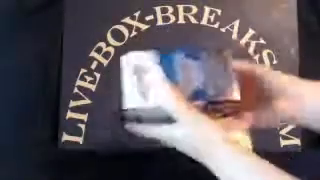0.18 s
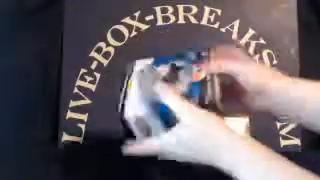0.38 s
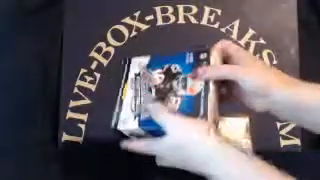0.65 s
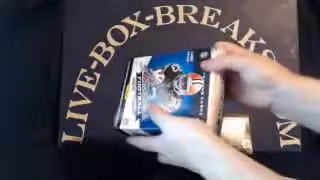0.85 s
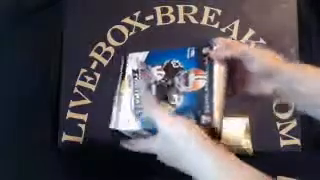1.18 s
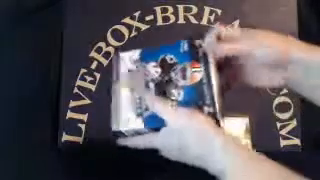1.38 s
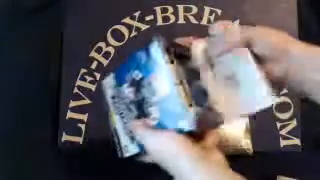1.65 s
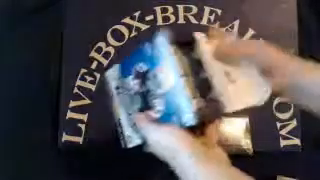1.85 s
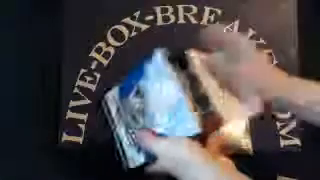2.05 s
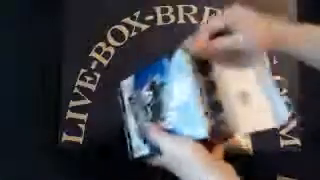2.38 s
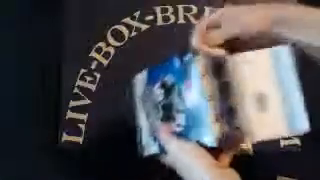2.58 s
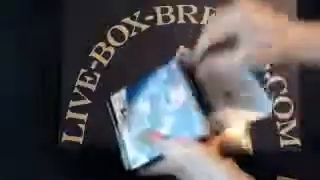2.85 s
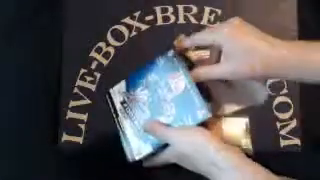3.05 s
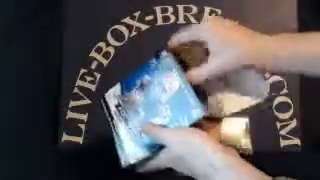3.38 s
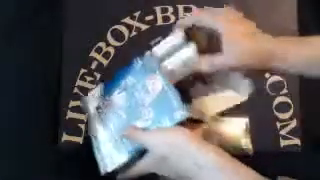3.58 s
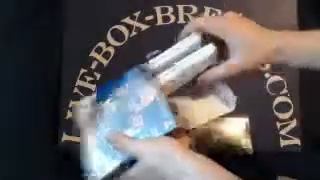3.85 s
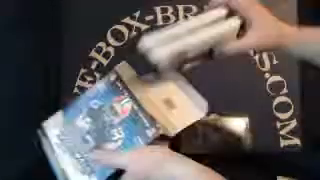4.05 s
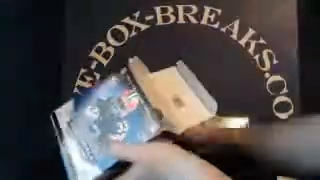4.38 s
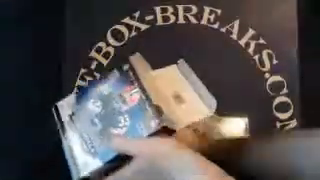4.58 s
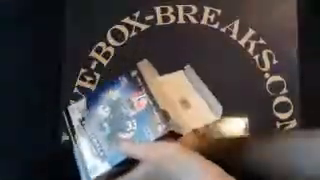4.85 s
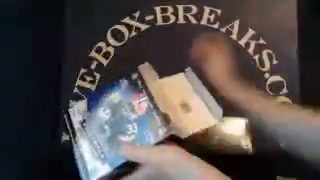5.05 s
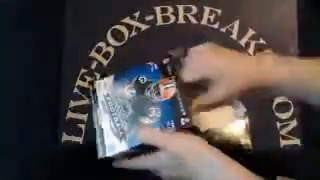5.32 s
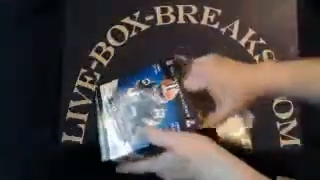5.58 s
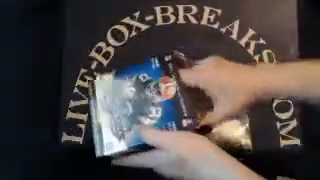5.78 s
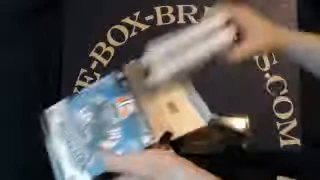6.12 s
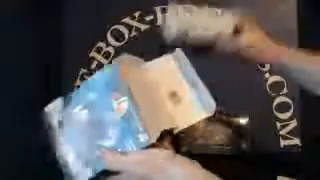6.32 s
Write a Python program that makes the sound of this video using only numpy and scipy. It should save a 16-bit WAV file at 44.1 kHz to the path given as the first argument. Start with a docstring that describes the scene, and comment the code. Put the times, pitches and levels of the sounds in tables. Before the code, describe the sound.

Close, dry handling of a small card box on a cloth-covered table, over a very faint hush. The first half second is almost silent; around 0.6 s there is a papery rub with a small snap, then little until 1.3 s, when brisk scuffs and a thud begin. From 1.55 to 2.35 s creases pop and crunch in quick, uneven succession. At about 2.5 s the lid cracks loose, the loudest snapping cluster, with a low hollow thump, and a harsh rustle trails to 2.8 s with brighter crackle. From 3 to 3.7 s only faint, crisp ticks and thin rubs. Packs slide out near 3.9 s; soft taps and scrapes follow, stronger at 4.5 and 4.95 s. Hollow bumps at 5.3 and 5.5 s lead to hard, short knocks around 5.7 and 5.8 s. After a quiet gap, a crackly rub and snap end it from 6.35 s.

```python
"""Two hands work open a cardboard box of trading cards on a cloth-covered table, close to a small microphone.
Creases snap as bursts of noise, and card and wrappers slide with noisy friction and tiny crackles;
both ring through the panels of the box. Fingertips and pack edges chafe as noise around a moving pitch.
Soft bumps are short, hollow tones with some noise. A small, dry room and a faint hush surround it all."""
import sys
import numpy as np
from scipy import signal
from scipy.fft import rfft, irfft
from scipy.io import wavfile
from scipy.ndimage import uniform_filter1d

SR = 44100
rng = np.random.default_rng(int(sys.argv[2]) if len(sys.argv) > 2 else 0)


def bounce(signal):
    """Save signal as a 16-bit WAV file at the path given by the first command-line argument."""
    frames = np.transpose(np.atleast_2d(signal))
    limited = np.clip(frames, -1, 1)
    pcm = np.round(limited * 32767).astype(np.int16)
    wavfile.write(sys.argv[1], SR, pcm)


N = 284004

# Colour of the quiet room and microphone hiss; only the shape counts: pitch_hz [Hz], level_db [dB per Hz]
HUSH_COLOUR = [(30, -27), (121, 3.5), (247, -1.5), (734, -10), (6340, -25.5), (8620, -33), (11200, -63)]
HUSH_DB = -78.5  # rms of the hush before the microphone
# Borders between bass, middle and treble: pitch_hz [Hz]
REGISTER_EDGES_HZ = [30, 450, 2800, 9000]
TOP_HZ = 8400  # upper limit of the microphone
# Panels of the box: pitch_hz [Hz], width_hz [Hz], level_db [dB above the direct sound], before the grip
PANELS = [(121.1, 140, 7.5), (224, 53, 9), (585.8, 39, 14.5), (700, 110, -3), (910, 39, -3), (1260, 290, 1),
          (1600, 230, -1.5), (2170, 180, 3), (2720, 36, -3.5)]
# Soft bumps of box and packs:
# start_s [s], level_db [dB], pitch_hz [Hz], fade_s [s to fall by 60 dB], contact_s [s]
BUMPS = [(0.507, -43.5, 553, 0.033, 0.0028), (1.461, -22, 230, 0.014, 0.0026),
         (1.805, -25.5, 200, 0.044, 0.0026), (2.340, -27, 585, 0.033, 0.0058),
         (2.493, -16, 130.5, 0.13, 0.0033), (2.505, -17.5, 578, 0.11, 0.0036),
         (2.534, -16.5, 133, 0.072, 0.0026), (2.749, -31, 142, 0.14, 0.0044),
         (3.272, -36.5, 210, 0.0084, 0.0092), (4.025, -33, 174, 0.025, 0.0019),
         (4.077, -29, 264, 0.076, 0.0014), (4.254, -38, 247, 0.078, 0.0033),
         (4.284, -38.5, 257, 0.1, 0.0058), (4.489, -29.5, 282, 0.086, 0.0031),
         (4.556, -20.5, 544, 0.018, 0.00096), (4.723, -27, 596, 0.049, 0.0029),
         (4.79, -35, 240, 0.12, 0.0013), (4.968, -21, 227, 0.057, 0.0027), (5.176, -31, 211, 0.096, 0.0031),
         (5.29, -22.5, 598, 0.048, 0.0049), (5.484, -17.5, 408, 0.05, 0.0041),
         (5.682, -11.5, 355, 0.025, 0.0016), (5.686, -17.5, 246, 0.061, 0.002),
         (5.796, -27, 261, 0.15, 0.0083), (5.796, -6.5, 470, 0.017, 0.0011),
         (5.798, -25, 690, 0.098, 0.0025), (5.839, -24, 251.7, 0.056, 0.00087),
         (6.359, -24.5, 624, 0.031, 0.0022)]
# Fingertips and pack edges dragging:
# start_s [s], length_s [s], pitch_hz [Hz, halfway through the drag, apart from the wander],
# width_hz [Hz], level_db [dB rms]
CHAFES = [(0.777, 0.19, 1534, 500, -54.5), (0.976, 0.15, 1700, 1110, -60), (1.246, 0.026, 1350, 483, -50),
          (1.358, 0.052, 3050, 1980, -36.5), (1.386, 0.027, 4900, 1400, -33),
          (1.384, 0.062, 1755, 910, -31), (1.768, 0.12, 4345, 1600, -52), (2.254, 0.017, 1306, 673, -37.5),
          (2.266, 0.031, 3810, 1490, -42), (2.471, 0.2, 1244, 160, -37.5), (2.53, 0.13, 2250, 350, -36.5),
          (2.844, 0.061, 2670, 495, -49.5), (2.915, 0.044, 793, 400, -40.5), (2.961, 0.049, 2169, 403, -41),
          (3.103, 0.074, 2090, 500, -45), (3.217, 0.022, 1905, 308, -43.5),
          (3.495, 0.095, 4060, 1770, -54.5), (3.737, 0.0413, 2697, 180, -48), (4.142, 0.06, 1236, 294, -53),
          (4.308, 0.02, 1470, 252, -51), (4.38, 0.0885, 1289, 403, -48), (4.486, 0.052, 2200, 350, -42),
          (4.709, 0.11, 700, 600, -41.5), (4.959, 0.036, 857, 294, -27), (5.143, 0.0168, 1176, 396, -37.5),
          (5.307, 0.027, 2547, 700, -49), (5.503, 0.025, 1172, 450, -49.5), (5.521, 0.19, 2612, 499, -53),
          (5.727, 0.075, 717, 250, -54.5), (6.36, 0.08, 2450, 500, -51)]
# Colour of sliding card: pitch_hz [Hz], level_db [dB]
SLIDING_COLOUR = [(40, -24), (75, -20.5), (140, -6.5), (260, -6), (420, -4), (900, 4.5), (1500, 0.5),
                  (2800, -7), (4500, -9.5), (7000, -12.5), (8500, -34.5)]
# Strokes of card and wrapper under the hands: the box is turned over and gripped, the flap is worked
# out of its slot, the lid cracks loose and is folded back, fingers dig for the packs and draw them out,
# the packs are laid down and pushed along the cloth, the hand returns to the box for more.
# start_s [s], length_s [s], level_db [dB before the overall sliding level],
# press_db [dB change of pressure over the stroke], bass_db and treble_db [dB relative to the middle],
# crackle_share [0 to 1]
STROKES = [ (0.048, 0.21, -73, -18, -7, 0, .3), (0.54, 0.011, -45.5, 18, -4, 0, 0.2),
           (0.613, 0.13, -45, -13, -5, -13.5, 0.3), (0.814, 0.28, -63.5, -12, -17, -15.5, 0.4),
           (1.28, 0.044, -48.5, 3, -0.5, -16, 0.1), (1.344, 0.099, -35, 7, -12, -4, 0.3),
           (1.453, 0.22, -42.5, -21.5, -6.5, -21.5, 0), (1.671, 0.14, -43, 16.5, -7, -24, 0.3),
           (1.79, 0.23, -38, -3, -5.5, -19.5, 0.7), (2.28, 0.11, -38.5, -8.5, -11.5, -24, 0.6),
           (2.491, 0.18, -36, -14.5, -2, -5, 0.7), (2.703, 0.082, -33.5, 8.5, -11.5, -11.5, 0.8),
           (2.823, 0.15, -47, 1, -19, 1.5, 0.1), (3.113, 0.086, -50.5, -24, -4, -5.5, 0.3),
           (3.258, 0.0066, -50, 0, 1.5, -5, 0.5), (3.331, 0.0068, -53, 12, -23, -16, 0.2),
           (3.41, 0.064, -61, -9, -14, -1, 0.4), (3.527, 0.085, -61.5, -20.5, -18.5, 2, 0.2),
           (3.721, 0.055, -50, 8.5, -15, -9, 0), (3.946, 0.17, -49, -18.5, 0, -11.5, 0.5),
           (4.221, 0.12, -50.5, -6.5, 2.5, -13.5, 0.2), (4.416, 0.082, -39, 10.5, -9.5, -10, 0.5),
           (4.516, 0.12, -37, -2, -13, -7, 0.6), (4.674, 0.15, -49, -9, -3, -1.5, 0.7),
           (4.83, 0.152, -40.5, 3.5, -10.5, -3, 0.1), (5.167, 0.064, -43.5, -3.5, -14.5, -15.5, 0.1),
           (5.31, 0.0013, -45.5, -2.5, 6.5, -4, 0.5), (5.44, 0.0032, -51.5, 3, -7.5, 1, 0.4),
           (5.525, 0.048, -46.5, -16, -11, -7, 0.5), (5.59, 0.23, -61, -8, 7.5, -12.5, 0.5),
           (6.355, 0.16, -39, 3, -8.5, -19, 0.79)]
# A smooth stroke eases in, one that catches starts abruptly; all die away once the hand stops
SMOOTH_RISE_DB_PER_S, CATCHING_RISE_DB_PER_S, STROKE_RELEASE_DB_PER_S = 352.5, 5998.5, 568.5
# Colour of a snap: pitch_hz [Hz], level_db [dB]
SNAP_COLOUR = [(40, -29.5), (75, -12), (130, 1.5), (420, 10.5), (850, 10), (1350, 10.5), (2800, -10.5),
               (4500, -17.5), (7000, -22), (8500, -43)]
# Creases and flaps snapping: start_s [s], level_db [dB over 10 ms, before the overall snap level],
# bass_db and treble_db [dB relative to the middle], flap_hz [Hz, ring of the flap]
SNAPS = [(0.617, -23, -11.5, -16, 1250), (0.71, -37, 1, -14, 740), (0.984, -47.5, -12, -6.5, 1680),
         (1.072, -53, -5.5, 0, 1400), (1.097, -39.5, -12.5, -6.5, 1440), (1.333, -32, 2.5, -40.5, 704),
         (1.522, -42, -15, 8, 1620), (1.555, -18.5, -37, -10, 1640), (1.565, -35.5, 4, -28, 1340),
         (1.629, -37, -20, -33, 1240), (1.659, -30, -9.5, -18.5, 675), (1.688, -34.5, -11.5, -18.5, 620),
         (1.753, -26.5, -6.5, -22.5, 785), (1.789, -23, -11, -6, 1750), (1.849, -24, -7.5, -7, 1580),
         (1.884, -31, -4.5, -5, 1440), (1.94, -25, -14, -18, 1520), (1.951, -31, -7, -4.5, 1630),
         (1.979, -22.5, -14, -3, 2750), (2.03, -34.5, -11, -25, 1010), (2.053, -36.5, -5.5, -28, 1000),
         (2.117, -36, -31, -29, 1010), (2.135, -29.5, -41, -15, 1250), (2.145, -28, -30, -23, 754),
         (2.175, -34.5, -17, -13.5, 846), (2.189, -35.5, -22, -5, 800), (2.2, -38, -15, -8.5, 1540),
         (2.278, -24.5, -4, -18, 1190), (2.296, -33, -1.5, 1, 1600), (2.321, -30.5, -16, -3, 1270),
         (2.339, -26, -19, -10, 710), (2.493, -7.5, -6, -14.5, 1250), (2.53, -11.5, -6.5, -1.5, 2180),
         (2.54, -8, -24, -6, 1400), (2.554, -20.5, -14, -3, 1450), (2.588, -12, -7.5, 1, 1280),
         (2.663, -43, -11, 15.5, 2870), (2.706, -18, -2.5, -2.5, 1520), (2.75, -28.5, 5.5, 7, 3320),
         (2.764, -31, 0, -4, 2390), (2.837, -30.5, -2, 10.5, 2840), (2.977, -41.5, -1.5, 14, 2140),
         (3.105, -39, -15, 5.5, 2650), (3.144, -40.5, -25, 8, 2270), (3.182, -34.5, 1, -25, 680),
         (3.194, -32.5, -6, -9, 2160), (3.414, -35.5, -9.5, -28, 695), (3.636, -45.5, -21.5, -2.5, 2020),
         (3.764, -46, -14.5, 8, 2830), (3.782, -29.5, -4.5, -17, 900), (3.935, -26, -6.5, -18, 1610),
         (3.98, -38.5, 2, -0.5, 1270), (4.036, -37.5, 1, -6.5, 1570), (4.078, -34.5, -23.5, -40, 1430),
         (4.288, -37.5, -13, -18, 1160), (4.582, -30.5, -0.5, -18, 840), (4.677, -33, -13.5, -7, 1015),
         (4.922, -30, -1.5, -17, 890), (4.962, -21, -2, -6.5, 940), (4.997, -20.5, -13, -7, 1620),
         (5.2, -29, -33, -8, 1150), (5.575, -36, -7, -16, 825), (6.361, -26.5, -2, -15, 702),
         (6.429, -28.5, -35, -3, 1360)]


def undb(db):
    """Turn decibels into a gain."""
    return 10 ** (np.asarray(db) / 20)


def seconds(length):
    """Time axis of a short sound."""
    return np.arange(int(length * SR)) / SR


def unit(x):
    """Scale to rms 1."""
    return x / np.sqrt(np.mean(x ** 2))


def add(track, start_s, sound):
    """Mix a sound in at a time."""
    start = int(start_s * SR)
    track[start:start + len(sound)] += sound[:max(N - start, 0)]


def lowpass_noise(top_hz, shape):
    """Noise below a cutoff."""
    sos = signal.butter(2, top_hz, fs=SR, output="sos")
    return signal.sosfilt(sos, rng.standard_normal(shape))


def band(x, lo_hz, hi_hz, order=3):
    """Keep only the sound between two pitches."""
    return signal.sosfilt(signal.butter(order, [lo_hz, hi_hz], "band", fs=SR, output="sos"), x)


def registers(x):
    """Split a sound into bass, middle and treble."""
    return [band(x, lo, hi) for lo, hi in zip(REGISTER_EDGES_HZ, REGISTER_EDGES_HZ[1:])]


def resonance(x, hz, width_hz):
    """Let one mode ring, with gain 1 at its centre."""
    return signal.lfilter(*signal.iirpeak(hz, hz / width_hz, fs=SR), x)


def through(x, response):
    """Pass a sound through an impulse response."""
    return signal.fftconvolve(x, response)[:len(x)]


def colour(points, size=4096):
    """Make an impulse response with a given spectrum and no sound ahead of its start."""
    hz, db = np.transpose(points)
    bins_hz = np.fft.rfftfreq(size, 1 / SR)
    gain = undb(np.interp(np.log(bins_hz + 1), np.log(hz), db))
    # folding the cepstrum gives minimum phase
    cepstrum = irfft(np.log(gain))
    cepstrum[1:size // 2] *= 2
    cepstrum[size // 2 + 1:] = 0
    return irfft(np.exp(rfft(cepstrum)))


def walk(rate):
    """Glide between random levels, about `rate` of them a second, with rms 1."""
    hold = int(SR / rate)
    levels = np.repeat(rng.standard_normal(N // hold + 1), hold)[:N]
    return unit(uniform_filter1d(levels, hold))


def quiet_hush():
    """Faint steady noise of the room and the microphone."""
    return undb(HUSH_DB) * unit(through(rng.standard_normal(N), colour(HUSH_COLOUR)))


def room(x, wet_db=-10, bass_t60=0.13, middle_t60=0.15, treble_t60=0.16, first_echo_s=0.0036):
    """Table and near walls answer within milliseconds; the treble fades slightly slower than the bass."""
    t = seconds(.4)
    parts = registers(rng.standard_normal(len(t)))
    fades_s = (bass_t60, middle_t60, treble_t60)
    tail = sum(part * np.exp(-np.log(1000) * t / t60) for part, t60 in zip(parts, fades_s))
    tail = tail * (t > first_echo_s)
    heard_share = 2 * TOP_HZ / SR
    return x + undb(wet_db) * through(x, tail * np.sqrt(heard_share / np.sum(tail ** 2)))


def box(push, grip_shift=.035, grip_db=3.5):
    """The panels ring along; a random grip shifts the pitch and level of each of them."""
    ring = push
    for hz, width_hz, db in PANELS:
        shift, boost = rng.standard_normal(2)
        mode = resonance(push, hz * (1 + grip_shift * shift), width_hz)
        ring = ring + undb(db + grip_db * boost) * mode
    return ring


def flexing_box(push, regrip_rate=14, count=4):
    """The hands keep passing from one grip to another, so the ring of the panels moves."""
    holds = np.exp(2 * np.array([walk(regrip_rate) for _ in range(count)]))
    shares = holds / holds.sum(axis=0)
    return sum(box(push * share) for share in shares)


def bumps(scuff_db=-15, scuff_reach=1.114, scuff_decay=0.41, lowest_hz=85, body_db=-13, body_ratio=0.52):
    """A soft contact swells one mode of the hollow box, a deeper one, and a dull rattle of weaker ones."""
    out, t = np.zeros(N), seconds(.2)
    for start_s, db, hz, t60, contact_s in BUMPS:
        swell = np.sin(np.pi / 2 * np.minimum(t / contact_s, 1)) ** 2
        fade = np.exp(-np.log(1000) * np.maximum(t - contact_s, 0) / t60)
        scuff = unit(band(rng.standard_normal(len(t)), hz / 2, hz * scuff_reach, order=2))
        main_mode = np.sin(2 * np.pi * hz * t)
        deep_mode = undb(body_db) * np.sin(2 * np.pi * body_ratio * hz * t)
        # the rattle outlasts the two modes
        rattle = undb(scuff_db) * fade ** scuff_decay * scuff
        add(out, start_s, undb(db) * swell * (fade * (main_mode + deep_mode) + rattle))
    # such a small box radiates almost no deep bass
    return band(out, lowest_hz, TOP_HZ)


def chafes(flick_share=0.9, flick_s=0.033, sag_share=0.18, wander_share=0.032, wander_rate=60,
           stutter_db=4, stutter_rate=220, taper=0.6):
    """A stuttering drag makes noise around a wandering pitch, rising in a quick flick, sagging in a long drag."""
    out = np.zeros(N)
    wander = wander_share * walk(wander_rate)
    stutter = undb(stutter_db * walk(stutter_rate))
    for start_s, length, hz, width_hz, db in CHAFES:
        t = seconds(length)
        now = int(start_s * SR) + np.arange(len(t))
        glide = flick_share * np.exp(-length / flick_s) - sag_share
        centre_hz = hz * (1 + wander[now] + glide * (t / length - .5))
        phase = 2 * np.pi * np.cumsum(centre_hz) / SR
        # two slow noises on a moving carrier make a moving noise band
        noise = lowpass_noise(width_hz / 2, (2, SR // 2))[:, :len(t)]
        ring = noise[0] * np.cos(phase) + noise[1] * np.sin(phase)
        outline = np.sin(np.pi * t / length) ** taper
        add(out, start_s, undb(db) * unit(ring * stutter[now] * outline))
    return out


def strokes():
    """Each stroke takes hold, changes pressure and lets go: gains of the registers, and share of crackle."""
    power, slipping = np.zeros((3, N)), np.zeros(N)
    margin_s = .15
    for start_s, length, db, press_db, bass_db, treble_db, catch in STROKES:
        catch, lead_s = np.clip(catch, 0, 1), min(start_s, margin_s)
        t = seconds(lead_s + length + margin_s) - lead_s
        rise_db_per_s = SMOOTH_RISE_DB_PER_S ** (1 - catch) * CATCHING_RISE_DB_PER_S ** catch
        attack_db = rise_db_per_s * np.minimum(t, 0)
        pressure_db = press_db * (np.clip(t / length, 0, 1) - .5)
        release_db = -STROKE_RELEASE_DB_PER_S * np.maximum(t - length, 0)
        gain = undb(db + attack_db + pressure_db + release_db)
        for register, part_db in zip(power, (bass_db, 0, treble_db)):
            add(register, start_s - lead_s, (gain * undb(part_db)) ** 2)
        add(slipping, start_s - lead_s, catch * gain ** 2)
    return np.sqrt(power), np.clip(slipping / (power[1] + 1e-18), 0, 1)


def crackle(spread_db=5.0, ring_cycles=2.8, count=5000):
    """Many tiny catches of card and wrapper ring for a few cycles each, with more of them per octave higher up."""
    out, t = np.zeros(N), seconds(.03)
    for when, pitch, strength in rng.random((count, 3)):
        hz = TOP_HZ * (.1 + .9 * pitch) ** 2
        # higher catches are stronger, and a few of any pitch stand out
        size = hz ** .7 * undb(-spread_db * np.log(max(strength, .06)))
        add(out, when * N / SR, size * np.exp(-t * hz / ring_cycles) * np.sin(2 * np.pi * hz * t))
    return unit(out)


def friction(judder_db=5.0, judder_rate=110, shift_db=4.5, shift_rate=28):
    """The contact point wanders, so each part of the noise comes and goes, and the whole judders."""
    edges = np.r_[REGISTER_EDGES_HZ[0], np.geomspace(300, REGISTER_EDGES_HZ[-1], 9)]
    noise = np.zeros(N)
    for lo, hi in zip(edges, edges[1:]):
        noise += band(rng.standard_normal(N), lo, hi) * undb(shift_db * np.tanh(walk(shift_rate)))
    return unit(noise * undb(judder_db * np.tanh(walk(judder_rate))))


def sliding(level_db=-2.88):
    """Stick and slip: juddering friction plus the crackle of small catches, played into the panels."""
    gains, catch = strokes()
    rub = np.sqrt(1 - catch) * friction() + np.sqrt(catch) * crackle()
    ring = flexing_box(through(rub, colour(SLIDING_COLOUR)))
    return undb(level_db) * sum(unit(part) * gain for part, gain in zip(registers(ring), gains))


def snaps(first_kick=7.0, uneven_db=5, break_s=0.0031, slower_when_dull=0.33, settle_db=-24,
          settle_s=0.02, flap_db=7, flap_q=6, level_db=-5.5):
    """A crease gives way, fibres break for a few milliseconds, and the card settles."""
    out, t = np.zeros(N), seconds(.12)
    response = colour(SNAP_COLOUR)
    level_window = .01 * SR  # samples
    for start_s, db, bass_db, treble_db, flap_hz in SNAPS:
        # a dull snap gives way more slowly than a bright one
        slowed_s = break_s * undb(-slower_when_dull * treble_db)
        fibres = np.exp(-(t / slowed_s - .5) ** 2)
        # a few strong fibres carry most of the break
        strength = unit(undb(uneven_db * rng.standard_normal(len(t))))
        settling = undb(settle_db) * np.exp(-t / settle_s)
        push = rng.standard_normal(len(t)) * (strength * fibres + settling)
        push[0] += first_kick
        # the free length of the flap gives each snap its own ring
        push = push + undb(flap_db) * resonance(push, flap_hz, flap_hz / flap_q)
        ring = box(through(push, response))
        for part, part_db in zip(registers(ring), (bass_db, 0, treble_db)):
            level = np.sqrt(level_window / np.sum(part ** 2))
            add(out, start_s, part * level * undb(db + part_db + level_db))
    return out


def scene():
    """All the handling in the room, over a faint hush."""
    handling = bumps() + chafes() + sliding() + snaps()
    return (room(handling) + quiet_hush())[None]


def record(dry, ceiling=0.57):
    """The microphone rounds off the loudest peaks, thins the deep bass and cuts the highest treble."""
    rounded = ceiling * np.tanh(dry / ceiling)
    thinned = signal.sosfilt(signal.butter(2, 68, "high", fs=SR, output="sos"), rounded)
    return signal.sosfilt(signal.ellip(8, .3, 60, TOP_HZ, fs=SR, output="sos"), thinned)


dry = scene()
out = record(dry)
bounce(out)
```